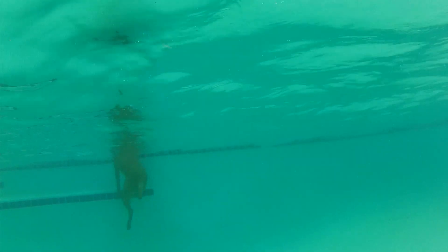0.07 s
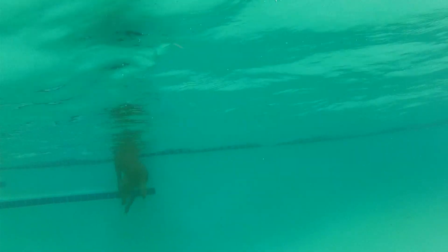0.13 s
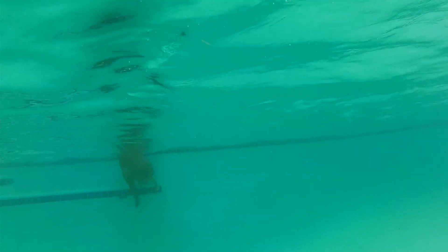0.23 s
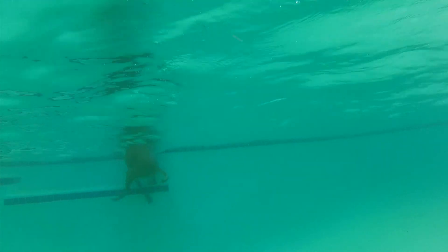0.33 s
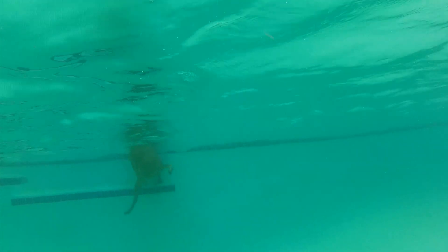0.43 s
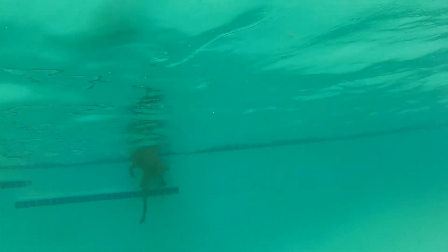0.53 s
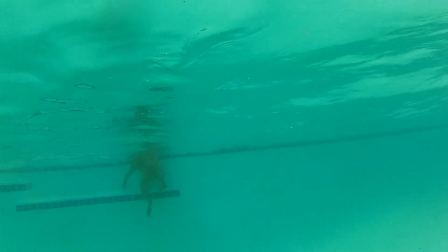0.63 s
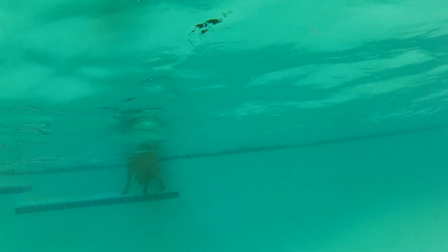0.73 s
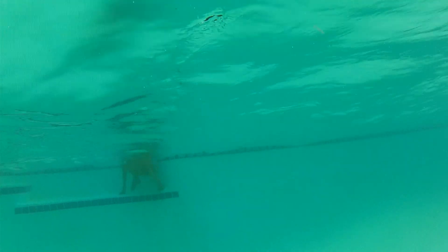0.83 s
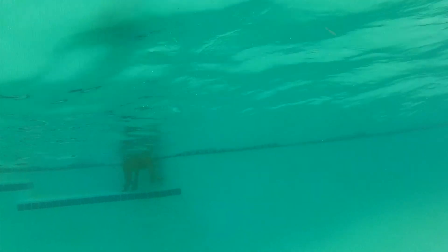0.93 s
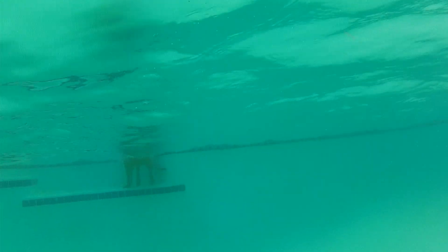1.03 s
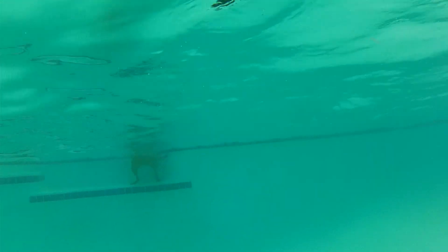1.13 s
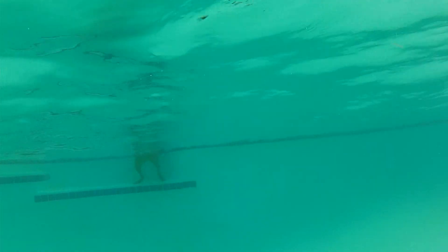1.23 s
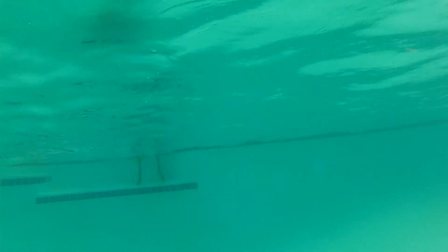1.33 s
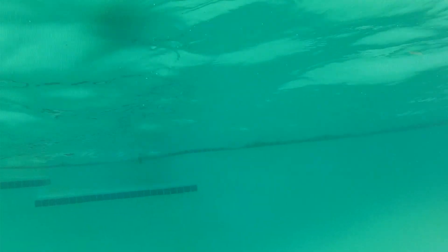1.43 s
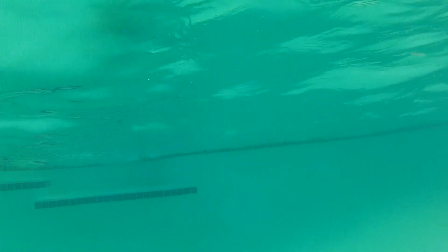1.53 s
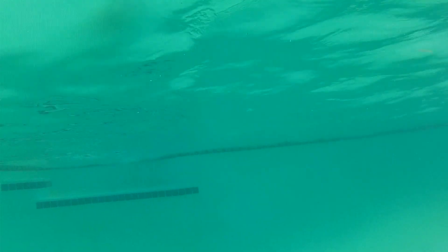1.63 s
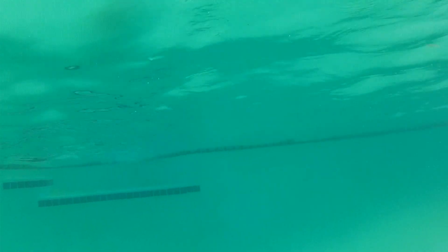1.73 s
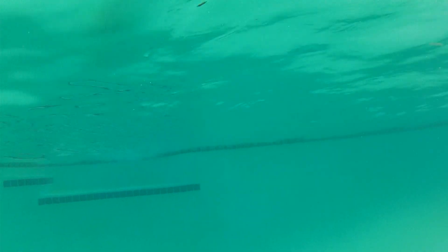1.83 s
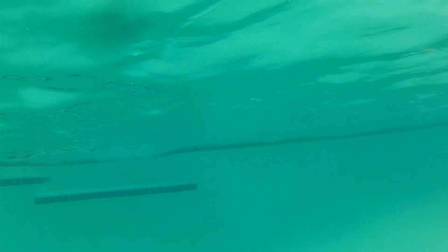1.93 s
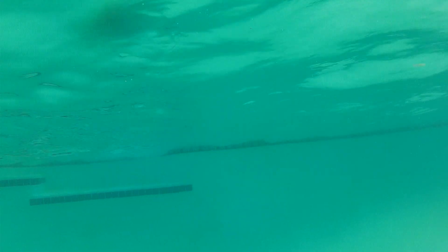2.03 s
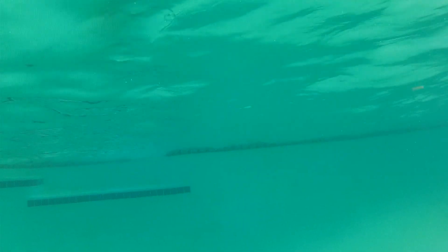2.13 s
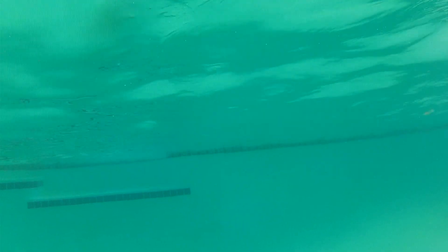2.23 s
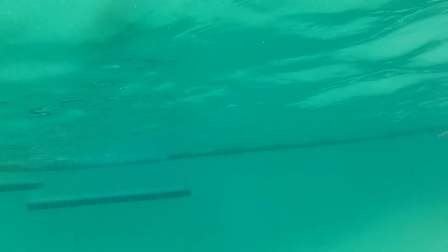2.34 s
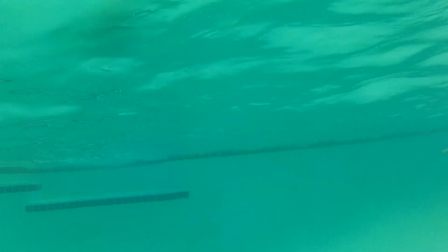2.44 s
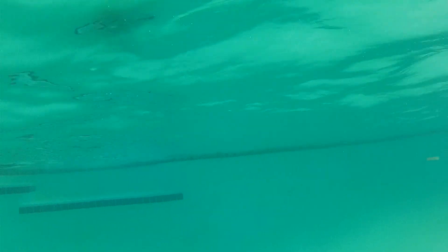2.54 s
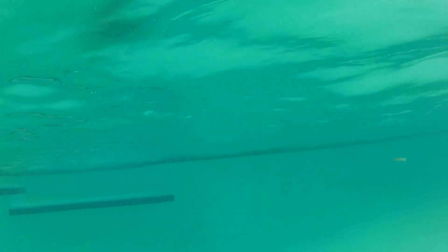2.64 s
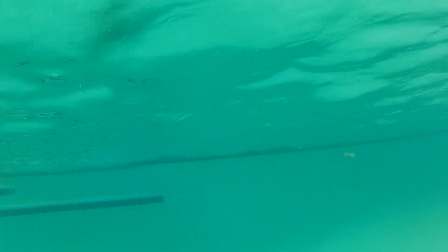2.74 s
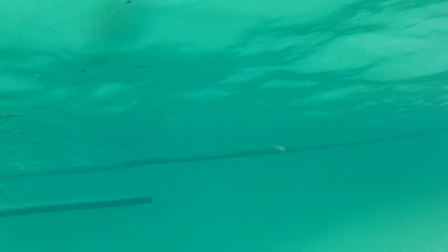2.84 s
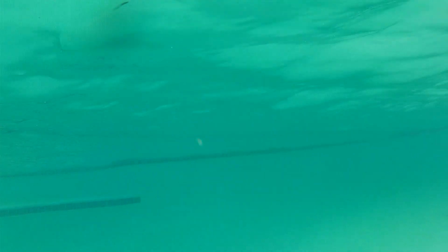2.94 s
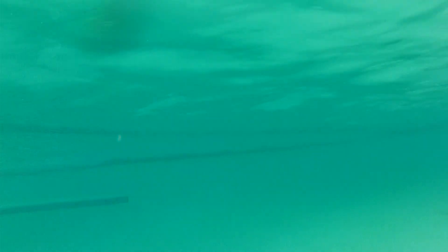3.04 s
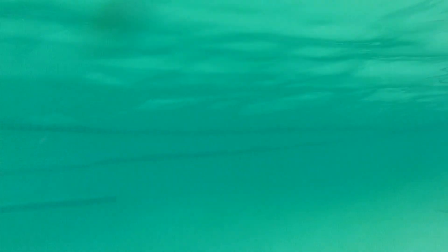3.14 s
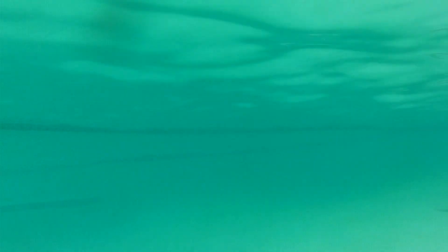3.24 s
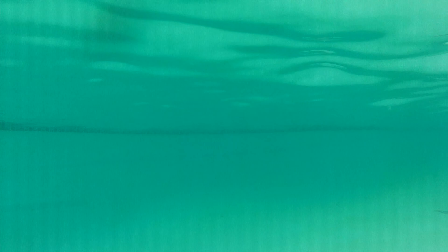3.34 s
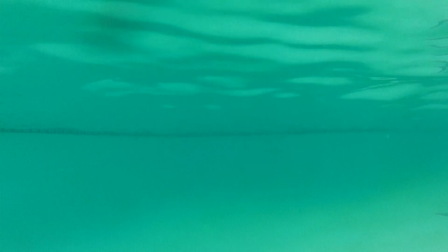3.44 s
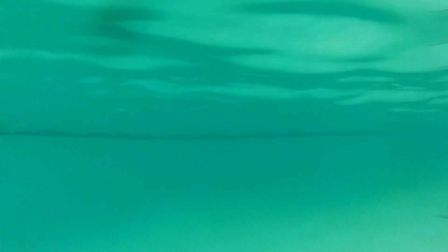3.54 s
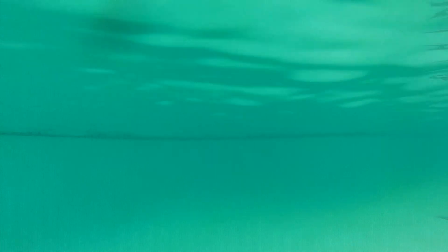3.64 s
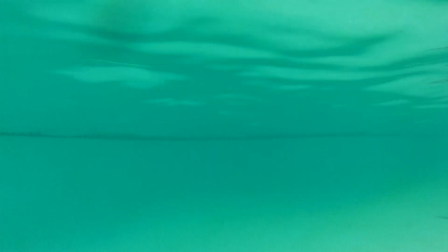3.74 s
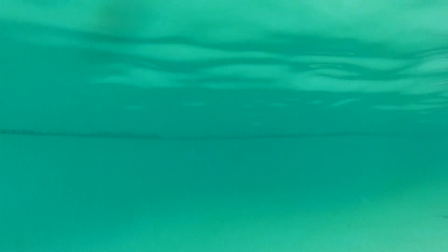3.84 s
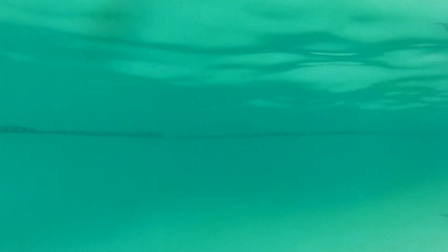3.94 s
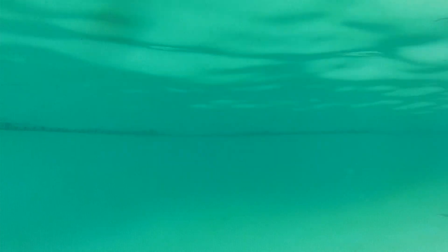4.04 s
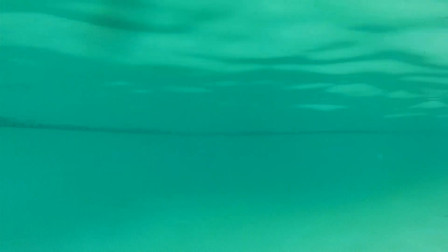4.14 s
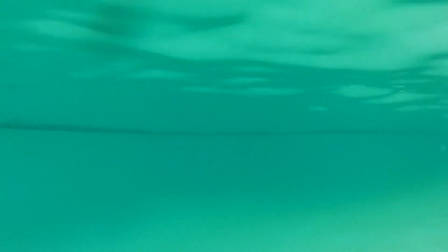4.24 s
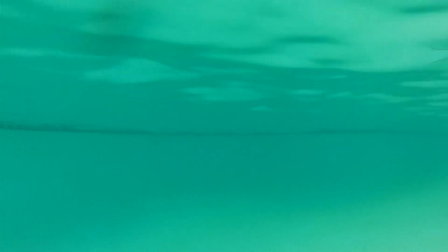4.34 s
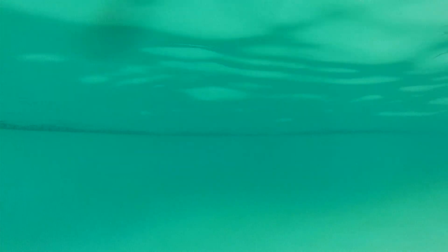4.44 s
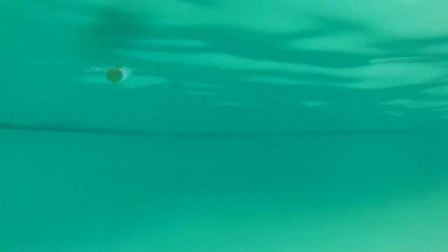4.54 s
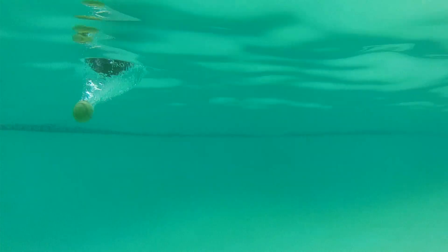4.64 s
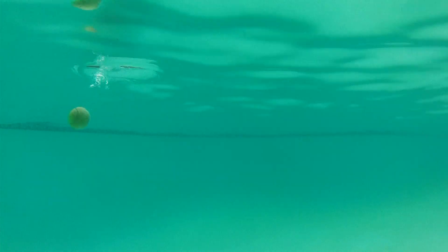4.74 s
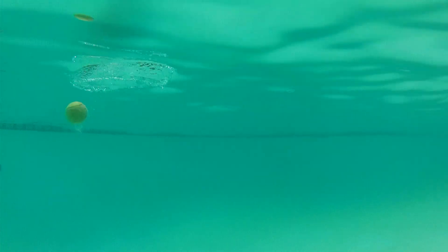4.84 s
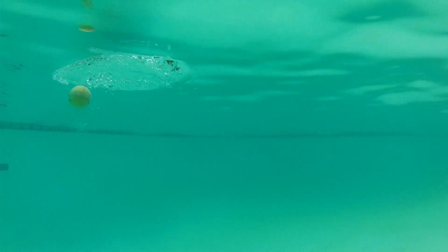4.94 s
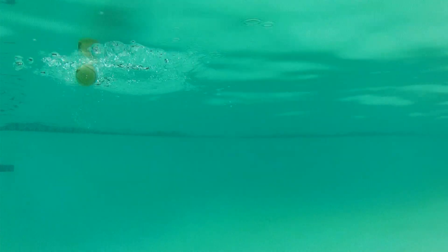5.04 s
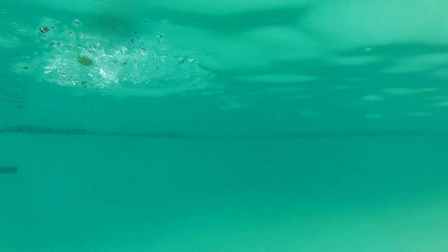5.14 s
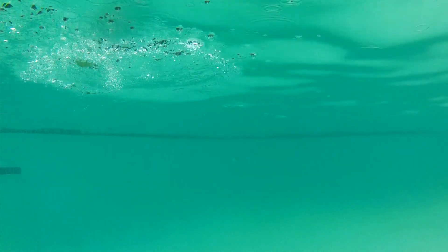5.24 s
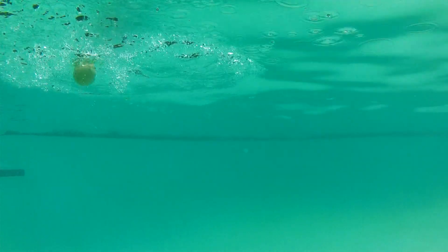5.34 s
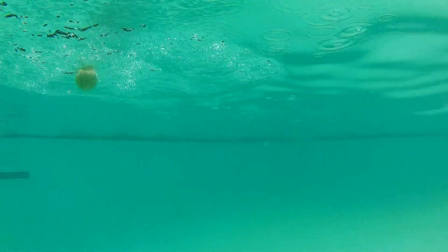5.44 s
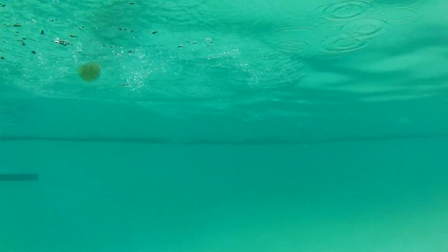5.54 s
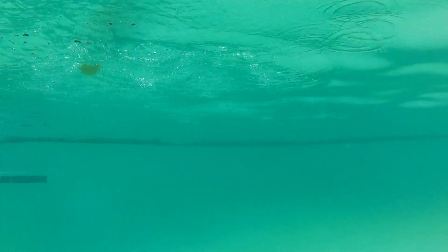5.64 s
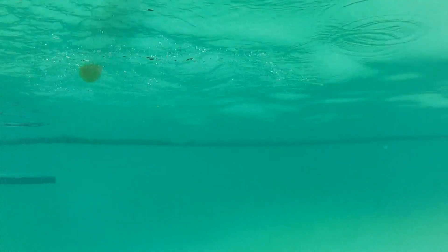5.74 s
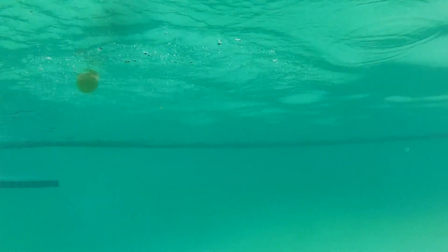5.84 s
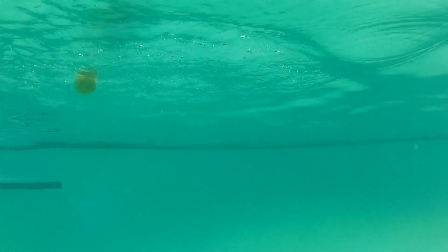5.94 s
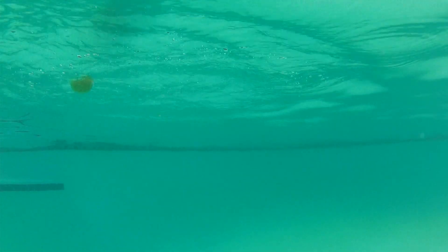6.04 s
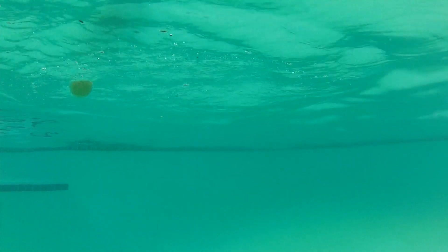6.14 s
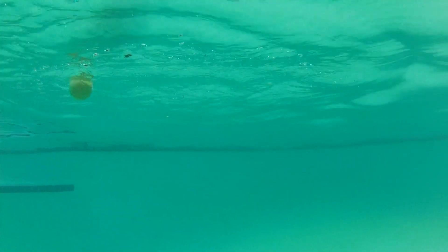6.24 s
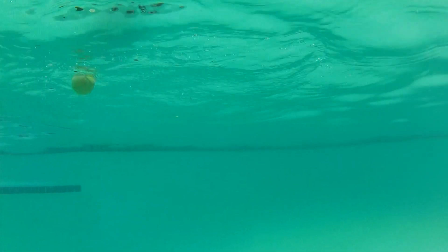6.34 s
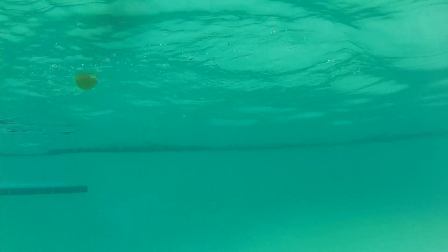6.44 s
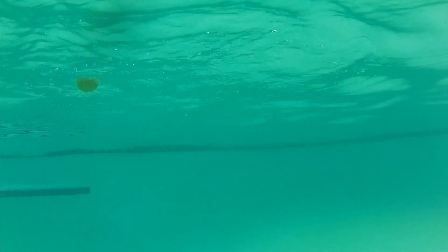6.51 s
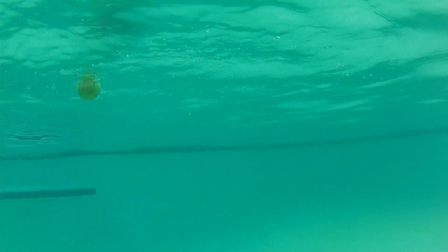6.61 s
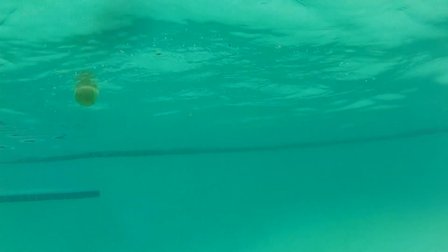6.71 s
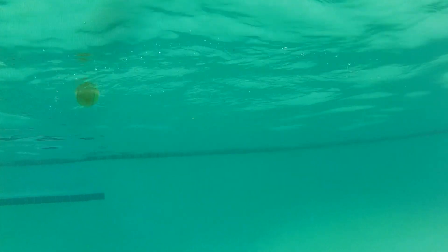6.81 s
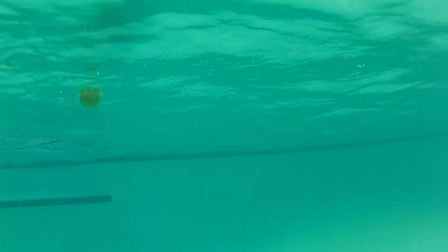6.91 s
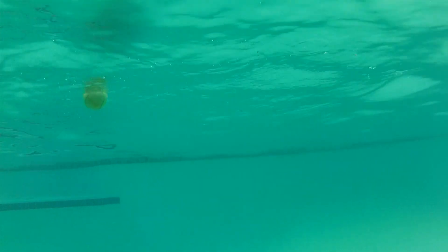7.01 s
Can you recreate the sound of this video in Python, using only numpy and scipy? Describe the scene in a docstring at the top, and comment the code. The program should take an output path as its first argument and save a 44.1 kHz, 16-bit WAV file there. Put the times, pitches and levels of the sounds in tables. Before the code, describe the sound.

Heard from a small camera under water in a pool, sharp ticks and grainy scrapes ring its plastic housing while light bubbles burble and a dog climbs out. The clicks thin out, leaving a low rumble and soft thumps of moving water. Then a ball plunges in with a gulp, crackling fizz and muffled churning bubbles, which settle to scattered ticks over a faint steady hiss.

```python
"""Sharp ticks and scrapes come first, ringing the plastic housing of a small camera under water in a pool.
A dog climbs out, a ball plunges in and bubbles churn. Big bubbles gulp and small ones fizz, each
ringing briefly, while moving water thumps and rumbles against the housing over a steady hiss.
The camera holds each sample at a low rate, so every sound is mirrored into the treble."""
import sys
import numpy as np
from scipy import signal
from scipy.fft import rfft, irfft
from scipy.io import wavfile

SR = 44100
rng = np.random.default_rng(int(sys.argv[2]) if len(sys.argv) > 2 else 0)


def put_to_file(sound):
    """Save the sound as 16-bit audio at rate SR, in the file named by the first command-line argument."""
    columns = np.atleast_2d(sound).T  # one column per channel
    safe = np.clip(columns, -1, 1)
    whole_steps = np.round(safe * 32767)
    wavfile.write(sys.argv[1], SR, whole_steps.astype(np.int16))


N = 311787

# The housing's modes, the notes it rings at. Each row: pitch in Hz, width in Hz, level in dB.
HOUSING_MODES = [(810, 46, -4), (959, 47, 0), (1179, 67, -3), (1476, 89, -1.5), (1652, 140, -2),
                 (1954, 114, -0.5), (2120, 64, 5), (2238, 73, 3), (2457, 111, 5), (2670, 95, 5),
                 (2867, 27, 4.5), (3015, 460, -7.5), (3416, 97, 1.5), (3600, 238, 0.5), (4183, 79, -6),
                 (4460, 150, -11.5), (5570, 360, -21.5)]
LOW_BELOW_HZ, TOP_ABOVE_HZ = 1800, 3000  # these split the modes into low, middle and top


def housing():
    """Ticks, grainy scrapes and strings of bubbles shake the plastic, which rings at its own notes."""
    hz, width, mode_db = np.transpose(HOUSING_MODES)
    is_low = hz < LOW_BELOW_HZ
    power = gain_of(mode_db) ** 2 * width * 2 * np.pi / SR  # how much white noise each mode lets through
    knocks = ticks(hz, power)
    low, middle, top = scrapes(power[is_low].sum(), power[~is_low].sum())
    rubs = [low if f < LOW_BELOW_HZ else top if f > TOP_ABOVE_HZ else middle for f in hz]
    rubs[BURBLE_MODE] = burble() / np.sqrt(power[BURBLE_MODE])
    grains = rng.standard_normal(N) * evened(gain_of(drift(240) + 2.5 * drift(31)))
    out = np.zeros(N)
    for k in range(len(hz)):
        plinks = evened(gain_of(3.8 * drift(18)))  # small bubbles wake one mode at a time
        push = knocks[k] + rubs[k] * grains * plinks
        out += (-1) ** k * gain_of(mode_db[k]) * ring(push, hz[k], width[k])
    return out


# Taps on the housing. Each row: start in seconds, level in dB, centre pitch in Hz, loss in dB one octave
# away (sign ignored; a bigger loss gives a more pitched tick), seconds for the tail to fade by 60 dB.
TICKS = [(0.027, -26.5, 2750, 11, 0.015), (0.154, -49, 2100, 25, 0.042), (.185, -33, 2500, 11, 0.053),
         (0.246, -39.5, 2620, -1, 0.11), (0.261, -35, 2480, 25, 0.025), (.278, -41, 2230, 42, 0.055),
         (0.358, -33.5, 2350, 38, 0.062), (.379, -38, 2110, 43, .024), (0.446, -33.5, 3100, 6, 0.052),
         (.641, -38, 3100, 21, 0.028), (0.67, -44.5, 2990, 50, 0.15), (0.737, -31.5, 2400, 12.5, 0.01),
         (0.913, -44, 2190, -5, 0.059), (1.057, -46, 1200, 8, 0.13), (1.088, -45, 1680, 13, 0.079),
         (1.189, -48, 966, 6.5, 0.12), (1.228, -39.5, 2320, 49, 0.033), (1.29, -48, 1590, 24, 0.052),
         (1.344, -59, 2620, 17, 0.036), (1.415, -48, 2580, 30, 0.045), (1.499, -39, 2530, 29, .02),
         (1.619, -51, 1960, 43, 0.096), (1.707, -54.5, 934, -11, 0.025), (1.865, -45.5, 940, 14, 0.043),
         (1.978, -54, 960, -13, 0.14), (2.23, -60, 3140, 21, 0.042), (2.392, -50, 815, 38, 0.025),
         (2.786, -61, 2080, 15, .07), (3.226, -63, 2090, 5, 0.092), (3.236, -43.5, 2480, 10.5, 0.17),
         (3.253, -38.5, 2470, 46, 0.07), (3.294, -53.5, 2500, 25, 0.08), (3.448, -52.5, 2730, 11, 0.072),
         (3.694, -63.5, 2040, 16, 0.053), (3.829, -50, 2400, 19, 0.08), (3.958, -60, 2120, 8, 0.047),
         (4.075, -49, 2140, 2, 0.27), (4.129, -41.5, 2120, 55, 0.045), (4.154, -49, 2120, 10, 0.027),
         (4.26, -58.5, 2550, -2, 0.13), (4.572, -42, 2850, -1.5, 0.11), (4.765, -37.5, 3730, 35, 0.15),
         (4.778, -43.5, 2150, 5, 0.27), (4.861, -44, 2580, 10, 0.18), (4.887, -38.5, 2720, 0, 0.07),
         (4.909, -32, 2840, 3, 0.037), (4.937, -34.5, 2530, 7, 0.074), (4.956, -51, 2560, 3, 0.047),
         (5.028, -44, 2130, -2, 0.14), (5.044, -33, 2450, 1, 0.068), (5.083, -34, 2920, 9, 0.047),
         (5.11, -32, 2610, 6, 0.032), (5.161, -38.5, 2120, 30, 0.052), (5.174, -43.5, 2500, 15, 0.04),
         (5.237, -50, 1500, 15, 0.055), (5.268, -43, 2180, 15, 0.13), (5.352, -48, 1590, 25, .047),
         (5.377, -42.5, 2490, 37, 0.053), (5.391, -30.5, 1350, 13.5, 0.014), (5.517, -52, 2640, 49, 0.14),
         (5.68, -51.5, 988, 7, 0.096), (5.718, -48, 2650, 3, 0.029), (5.739, -44, 1780, 45, .046),
         (6.296, -50.5, 1480, 5, 0.061), (6.366, -65, 2400, 4, 0.045), (6.455, -56.5, 2400, -11, .055),
         (6.509, -52, 1440, 4, 0.11), (6.63, -48, 1450, 5, .041), (6.873, -57.5, 1540, 22, 0.046),
         (6.929, -56, 2600, 29, 0.07), (6.948, -56, 940, 9, .021), (7.053, -51, 2690, 20, 0.087)]
TICK_RISE_S, WALL_ECHO_S, WALL_ECHO_DB = 0.0012, 0.0092, -11.5


def ticks(mode_hz, power):
    """Each tick is a dying burst of noise with one echo off the pool wall. Gives one push per mode."""
    pushes = np.zeros((len(mode_hz), N))
    t = np.arange(6000) / SR
    for start, db, centre_hz, loss_db, fade_s in TICKS:
        shape = 2.66 * np.exp(-t / 0.0019) + gain_of(-60 * t / fade_s)  # a hard front, then a rattle
        shape *= 1 - np.exp(-t / TICK_RISE_S)
        crack = rng.standard_normal(len(t)) * gain_of(3 * rng.standard_normal(len(t)))
        crack *= shape / np.sqrt(np.sum((shape * crack) ** 2) / np.sum(shape ** 2))
        add(crack, WALL_ECHO_S, gain_of(WALL_ECHO_DB) * crack)
        octaves_away = np.log2(mode_hz / centre_hz)
        shares = gain_of(-abs(loss_db * octaves_away) + 2 * rng.standard_normal(len(mode_hz)))
        shares /= np.sqrt(np.sum(power * shares ** 2))
        for push, share in zip(pushes, shares):
            add(push, start, gain_of(db) * share * crack)
    return pushes


# Stretches of rubbing and fizz. Each row: start in seconds, length in seconds, level in dB,
# change in dB by the end, level of the low modes in dB compared with the middle ones.
SCRAPES = [(0.001, 0.033, -47, 2, -8), (0.24, 0.15, -50.5, 1.5, -2), (0.311, 0.071, -40.5, -2.5, -6),
           (0.533, 0.15, -62.5, 15, -16), (0.785, 0.12, -65.5, 0.5, -11), (0.95, 0.16, -63.5, 5.5, -7),
           (1.085, 0.45, -63, 14.5, -2), (1.387, 0.73, -51, -14, -1.5), (2.196, 0.24, -71, 0, -11),
           (3.224, 0.088, -48.5, -20, -19), (3.427, 0.019, -67, 1, -6), (3.684, 0.2, -79, -2, -2),
           (4.069, 0.058, -60.5, -1, 3.5), (4.205, 0.24, -72, 2, -3), (4.547, 0.29, -56, -10, -7.5),
           (4.677, 0.046, -54.5, -4, 2), (4.763, 0.048, -39.5, 0, -13.5), (4.854, 0.05, -50, 4, -7),
           (4.9, 0.13, -48.5, -18, -6), (5.017, 0.054, -50, 0, -16), (5.104, 0.27, -49, -5, -5),
           (5.415, 0.088, -52, -8.5, -7.5), (5.542, 0.14, -53.5, -15, -6), (5.663, 0.18, -57, -1, -7.5),
           (6.29, 0.94, -87, 0, -4)]
SCRAPE_RISE_S, SCRAPE_FADE_S = 0.004, 0.017
TOP_DB, TOP_TRADE = -7, 0.29  # the more a scrape wakes the low modes, the less it wakes the top ones


def scrapes(low_power, other_power):
    """How hard rubbing drives the low, middle and top modes: a quick start, a steady change, a soft end."""
    low, middle, top = np.zeros((3, N))
    for start, length, db, change_db, low_db in SCRAPES:
        t = np.arange(N) / SR - start
        rise = np.clip(t / SCRAPE_RISE_S, 0, 1)
        fade = np.exp(-np.maximum(t - length, 0) / SCRAPE_FADE_S)
        rub = rise * fade * gain_of(db + change_db * np.clip(t / length, 0, 1))
        low = np.maximum(low, gain_of(low_db) * rub)
        middle = np.maximum(middle, rub)
        top = np.maximum(top, gain_of(TOP_DB - TOP_TRADE * low_db) * rub)
    return low / np.sqrt(low_power), middle / np.sqrt(other_power), top / np.sqrt(other_power)


# Swells from strings of bubbles. Each row: time of the peak in seconds, level in dB.
BURBLE_SWELLS = [(.29, -57), (.39, -61.5), (.65, -61), (.715, -55.5), (.8, -58.5), (.88, -62), (.96, -53.5),
                 (1.05, -67), (1.16, -54.5), (1.442, -50.5), (1.54, -58.5), (1.754, -56), (1.87, -55.5),
                 (1.998, -63), (2.124, -74), (4.578, -66), (4.872, -55), (4.95, -63.5), (5.122, -54),
                 (5.22, -59), (5.316, -50.5), (5.562, -67), (5.676, -70)]
BURBLE_MODE, BURBLE_RISE_DB_PER_S, BURBLE_FALL_DB_PER_S = 1, 162, 148


def burble():
    """How hard strings of bubbles drive the lowest strong mode: each swell climbs, then sinks."""
    t = np.arange(0, N, 64) / SR
    peak_s, db = np.transpose(BURBLE_SWELLS)[:, :, None]
    drop_db = np.maximum(BURBLE_RISE_DB_PER_S * (peak_s - t), BURBLE_FALL_DB_PER_S * (t - peak_s))
    loudest = gain_of(db - drop_db).max(axis=0)
    return np.interp(np.arange(N) / SR, t, loudest)


# Single bubbles. Each row: start in seconds, level in dB, pitch in Hz, seconds to fade by 60 dB.
BUBBLES = [(.149, -49, 376, 0.11), (.2904, -43, 995, 0.082), (.348, -52.5, 446, 0.2),
           (1.058, -50.5, 1200, 0.11), (1.0884, -47.5, 1640, 0.076), (1.138, -56, 588, 0.23),
           (1.1378, -50.5, 1420, 0.29), (1.2286, -42, 2450, 0.06), (1.4137, -39, 2800, 0.047),
           (1.5344, -61.5, 1460, 0.11), (1.6794, -56, 2180, .042), (1.8068, -49.5, 1553, 0.13),
           (1.815, -47, 444, 0.14), (1.984, -45.5, 431, 0.081), (2.392, -49, 2010, 0.034),
           (2.4149, -57, 1650, 0.073), (2.468, -51.5, 449, 0.1), (2.7866, -58.5, 2160, .05),
           (3.233, -42.5, 405, 0.02), (3.292, -51, 387, 0.05), (3.72, -49, 540, .032),
           (4.078, -31.5, 693, 0.024), (4.143, -42, 350, 0.019), (4.3365, -60, 2170, 0.096),
           (4.572, -29.5, 297, 0.048), (4.697, -22.5, 437, 0.079), (4.763, -42, 588, 0.095),
           (4.859, -38, 474, 0.056), (4.905, -39.5, 335, 0.039), (4.955, -36.5, 413, 0.02),
           (5.028, -41, 610, 0.06), (5.109, -24.5, 386, 0.0092), (5.144, -38, 578, 0.15),
           (5.3, -44.5, 354, 0.072), (5.3314, -42.5, 970, 0.03), (5.392, -25.5, 395, 0.034),
           (5.568, -37.5, 330, 0.092), (5.594, -32.5, 302, 0.11), (5.617, -34.5, 300, .046),
           (5.629, -38, 279, 0.19), (5.665, -36.5, 397, 0.091), (5.685, -28.5, 377, 0.028),
           (5.754, -40.5, 290, 0.12), (5.791, -45.5, 386, .11), (5.8002, -50, 1204, 0.053),
           (6.097, -51.5, 446, 0.17), (6.509, -34, 490, 0.018), (6.63, -49.5, 606, .039),
           (6.719, -54.5, 514, 0.18)]


def gulps():
    """Bubbles ring one by one: big ones gulp low, small ones plink high."""
    out = np.zeros(N)
    for start, db, hz, fade_s in BUBBLES:
        add(out, start, -gain_of(db) * bubble(hz, fade_s, climb=1.09))
    return out


def bubble(hz, fade_s, climb):
    """A pure tone that snaps on, dies away and climbs in pitch as the bubble nears the surface."""
    t = np.arange(round(fade_s * SR) + 200) / SR
    snap = 1 + 1.03 * np.exp(-t * hz / 1.16)  # pinching off makes the first swing strongest
    shape = snap * gain_of(-60 * t / fade_s) * (1 - np.exp(-2 * t * hz))
    return shape * np.sin(2 * np.pi * hz * t * (1 + climb * t))


# How loud the bubble swarm is. Each row: time in seconds, level in dB.
CHURN_LEVELS = [(0, -72), (.85, -72.5), (1.4, -69.5), (1.87, -59), (2.02, -61.5), (2.1, -72.5),
                (3.5, -77.5), (4.24, -69), (4.55, -69.5), (4.7, -55.5), (4.93, -51.5), (5, -59),
                (5.37, -51.5), (5.53, -64.5), (5.57, -49.5), (5.71, -47), (5.9, -66), (6.05, -69.5),
                (6.11, -61), (6.22, -64), (7.07, -72)]
# The swarm's tone colour. Each row: pitch in Hz, relative level in dB.
CHURN_COLOUR = [(120, -41), (200, -13), (297, -7), (327, -8.5), (387, -2.5), (565, -1.5), (800, -16),
                (1040, -73), (1760, -120)]


def churn(slosh):
    """Many bubbles of different sizes overlap at random, swelling as the water sloshes."""
    swarm = np.zeros(N)
    for hz in np.geomspace(210, 780, num=24):
        strength = gain_of(2.73 * np.minimum(rng.exponential(1, N), 4))
        births = rng.random(N) < 25 / SR  # about 25 a second at each pitch
        swarm += signal.oaconvolve(strength * births, bubble(hz, 12 / hz, climb=0.4))[:N] * np.sqrt(hz)
    return gain_of(curve(CHURN_LEVELS)[0] + 2.76 * slosh) * shaped(swarm, CHURN_COLOUR)


# Shoves of water. Each row: start in seconds, level in dB, pitch in Hz, main swell's length in seconds.
THUMPS = [(2.245, -42, 130, 0.0095), (3.706, -50, 55.4, 0.013), (3.974, -36.5, 59, 0.011),
          (4.058, -31.5, 139, 0.015), (4.151, -37, 133, 0.023), (4.37, -38, 135, 0.013),
          (4.476, -36, 61, 0.031), (4.506, -38, 127, 0.02), (4.721, -39.5, 54.7, 0.023),
          (5.474, -36.5, 50.6, 0.031), (6.513, -35.5, 152, 0.017), (6.519, -31, 47.5, 0.018),
          (7.042, -41, 47.4, 0.039)]


def thumps():
    """Water shoves the whole housing into a few soft swings."""
    out = np.zeros(N)
    for start, db, hz, length in THUMPS:
        t = np.arange(round(3 * length * SR)) / SR
        swell = 5.49 * t / length * np.exp(-2.5 * t / length)
        add(out, start, gain_of(db) * swell * np.sin(2 * np.pi * hz * t))
    return out


# How loud the rumble is. Each row: time in seconds, deep rumble in dB, upper rumble in dB.
RUMBLE_LEVELS = [(0, -57.5, -65), (.47, -64.5, -64.5), (.77, -56.5, -65.5), (1.5, -61.5, -66),
                 (1.9, -58.5, -64.5), (2.05, -60.5, -64.5), (2.4, -62, -65.5), (2.81, -54.5, -64.5),
                 (3.1, -57.5, -65.5), (3.56, -55, -65.5), (4.08, -50.5, -62.5), (4.45, -53, -64),
                 (4.65, -52, -57.5), (5.16, -56, -53.5), (5.4, -51.5, -56.5), (5.75, -54.5, -54.5),
                 (6.32, -58, -62), (6.75, -48.5, -63), (7.07, -54, -66.5)]
# The tone colours of the two rumbles. Each row: pitch in Hz, relative level in dB.
DEEP_COLOUR = [(12, -44), (20, -7), (38, -4), (54, 0.5), (67, -1.5), (95, -22), (120, -58), (210, -120)]
UPPER_COLOUR = [(53, -33), (90, -7.5), (129, -4.5), (151, -5.5), (172, -9), (200, -14.5), (230, -18.5),
                (300, -31), (510, -120)]


def rumble(slosh):
    """Moving water rocks the housing in uneven lumps, around two low pitches."""
    deep_db, upper_db = curve(RUMBLE_LEVELS)
    deep = gain_of(deep_db + 1.45 * slosh) * shaped(rng.standard_normal(N), DEEP_COLOUR)
    upper = gain_of(upper_db + 2.07 * slosh) * shaped(rng.standard_normal(N), UPPER_COLOUR)
    return deep + upper


# The tone colour of the hiss. Each row: pitch in Hz, relative level in dB.
HISS_COLOUR = [(130, -29), (220, -1), (344, -3), (416, -9.5), (457, -10), (650, -13), (1020, -15.5),
               (2230, -16), (3260, -19), (4820, -20.5), (5600, -22.5), (7280, -96), (12300, -120)]


def hiss():
    """A faint, steady noise behind everything."""
    return gain_of(-68.5) * shaped(rng.standard_normal(N), HISS_COLOUR)


def gain_of(db):
    """Turns decibels into a number to multiply by."""
    return 10 ** (np.asarray(db) / 20)


def evened(x):
    """Scales a signal to an average power of 1."""
    return x / np.sqrt(np.mean(x ** 2) + 1e-20)


def curve(rows):
    """Joins a table's timed points with straight lines, one curve per level column."""
    times, *columns = np.transpose(rows)
    return [np.interp(np.arange(N) / SR, times, column) for column in columns]


def add(mix, start, sound):
    """Mixes a sound in at a start time in seconds."""
    part = mix[round(start * SR):][:len(sound)]
    part += sound[:len(part)]


def shaped(x, colour):
    """Gives a signal a tone colour and an average power of 1."""
    points_hz, db = np.transpose(colour)
    hz = np.fft.rfftfreq(len(x), 1 / SR)
    gains = gain_of(np.interp(np.log(hz + 1), np.log(points_hz + 1), db))
    return evened(irfft(rfft(x) * gains, len(x)))


def drift(hz):
    """A random wobble, up to about hz swings a second."""
    return evened(signal.sosfilt(signal.butter(2, hz, fs=SR, output="sos"), rng.standard_normal(N)))


def ring(push, hz, width):
    """One mode answers a push; the narrower it is, the longer it rings."""
    pole = np.exp((2j * np.pi * hz - np.pi * width) / SR)
    return 2 * signal.lfilter([1 - abs(pole)], [1, -pole], push).real


def scene():
    """All sources over the hiss; the same slosh swells both the swarm and the rumble."""
    background = hiss()
    slosh = drift(10)
    return (housing() + gulps() + churn(slosh) + thumps() + rumble(slosh) + background)[None]


HOLD_HZ, TREBLE_LIMIT_HZ = 12000, 15450


def record(dry):
    """The camera cuts the treble, then holds each sample, which mirrors the sound back up high."""
    first_cut = signal.firwin(81, 0.48 * HOLD_HZ, window=("kaiser", 5.0), fs=SR)
    narrow = signal.oaconvolve(dry, first_cut[None], "same")
    mirrored = narrow * (1 + 2 * np.cos(2 * np.pi * HOLD_HZ * np.arange(N) / SR))
    dulling = np.sinc(np.fft.rfftfreq(N, 1 / SR) / HOLD_HZ)  # holding softens the mirror images
    held = irfft(rfft(mirrored) * dulling, N)
    held += gain_of(-86) * rng.standard_normal(held.shape)  # faint amplifier noise
    last_cut = signal.firwin(201, TREBLE_LIMIT_HZ, window=("kaiser", 9), fs=SR)
    return signal.oaconvolve(held, last_cut[None], "same")


dry = scene()
out = record(dry)
put_to_file(out)
```